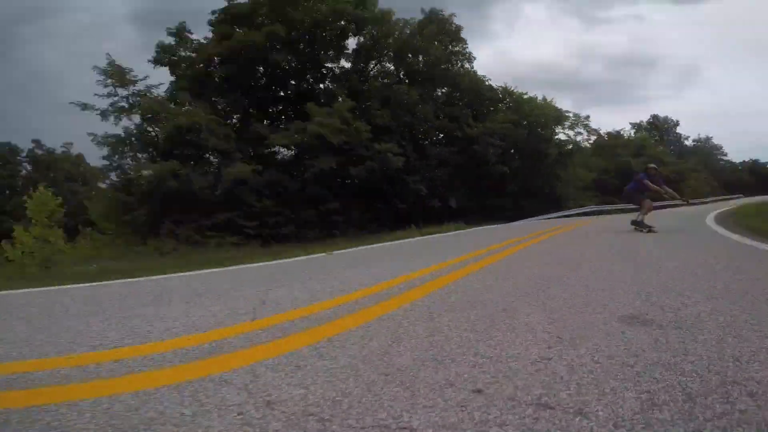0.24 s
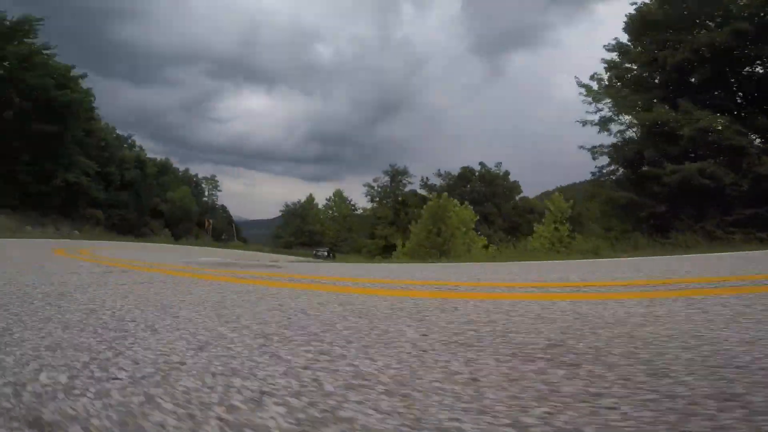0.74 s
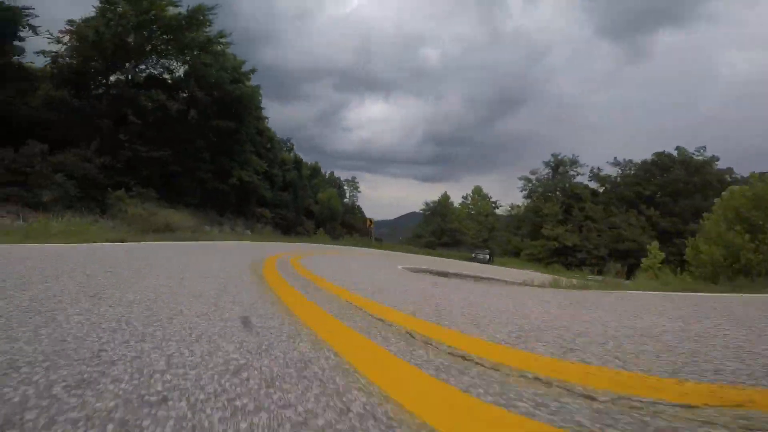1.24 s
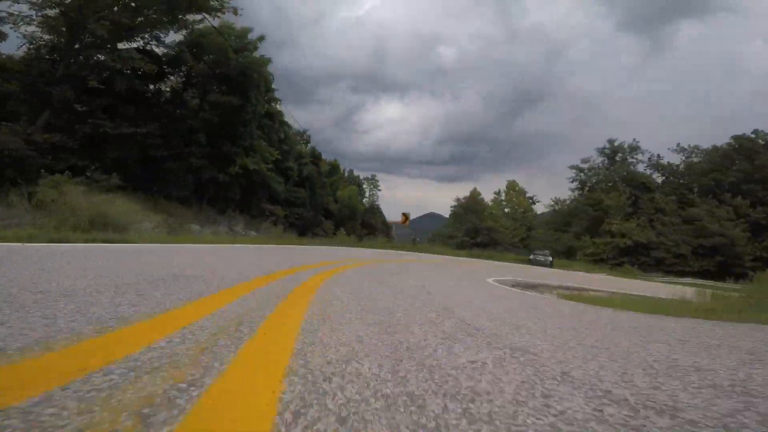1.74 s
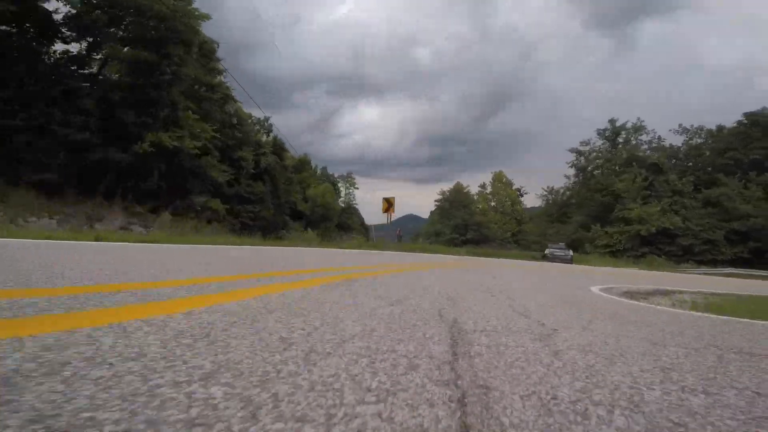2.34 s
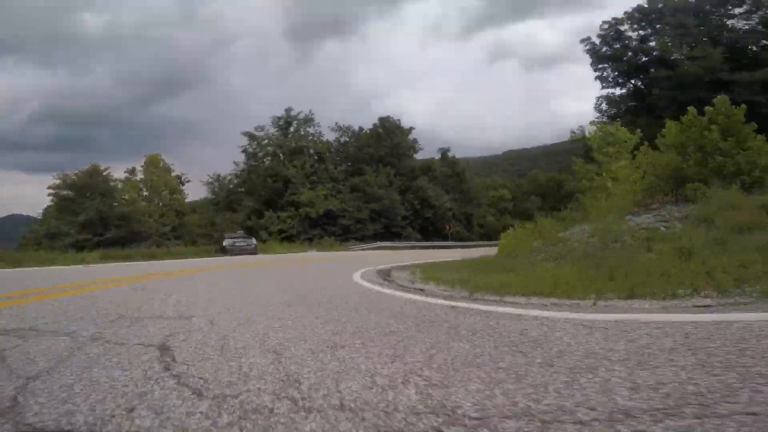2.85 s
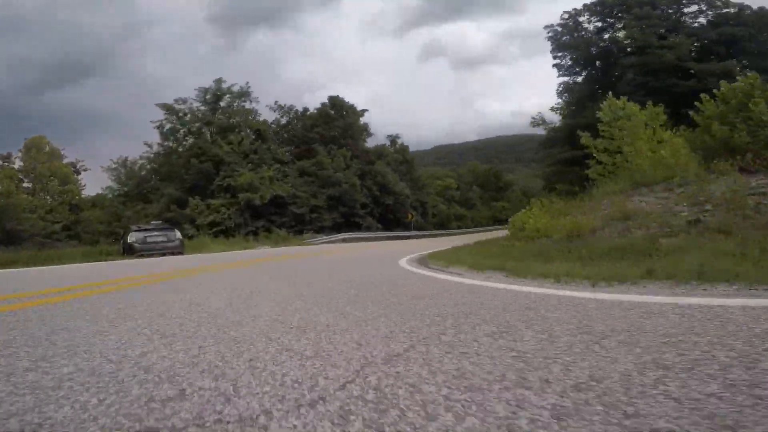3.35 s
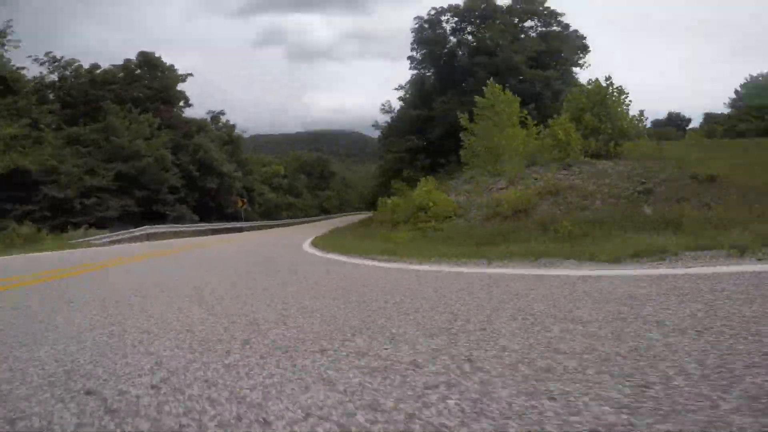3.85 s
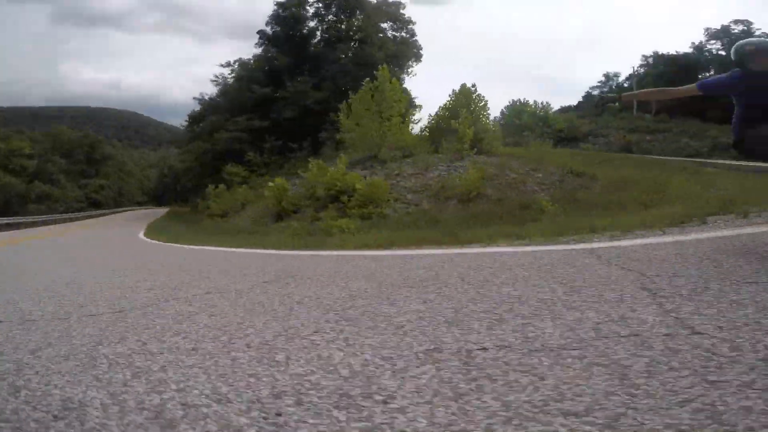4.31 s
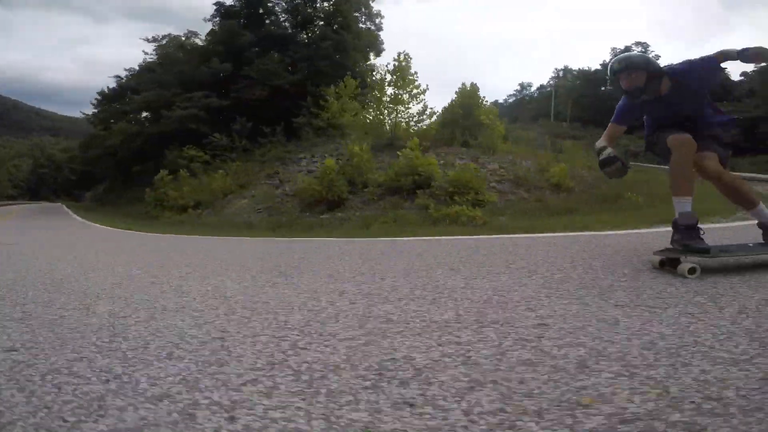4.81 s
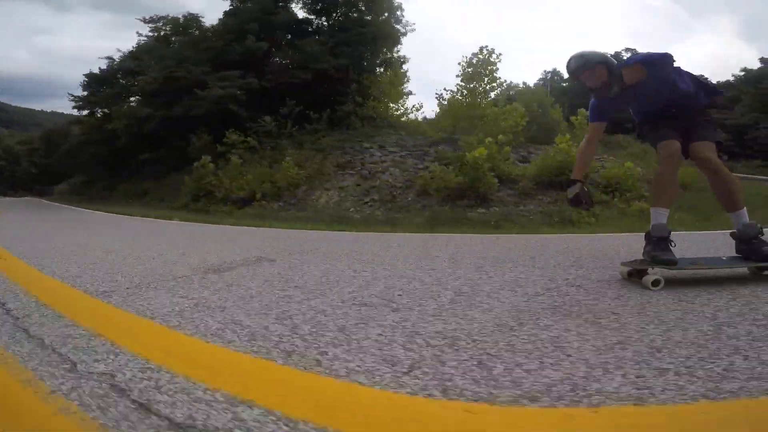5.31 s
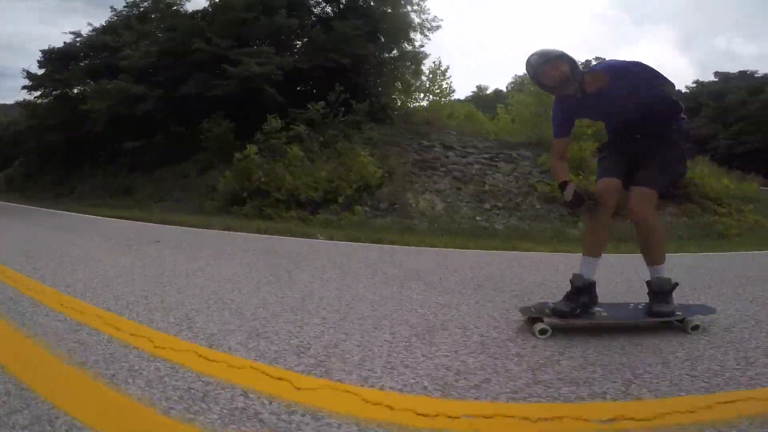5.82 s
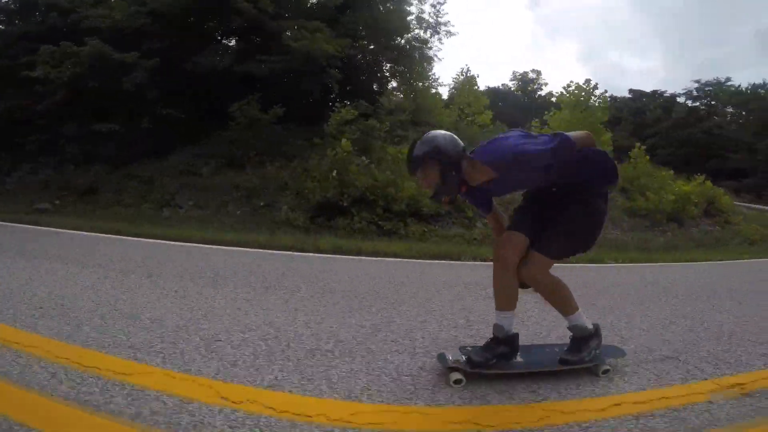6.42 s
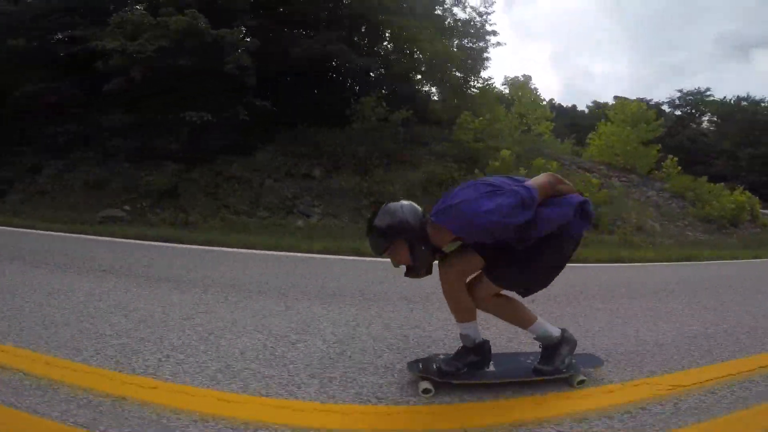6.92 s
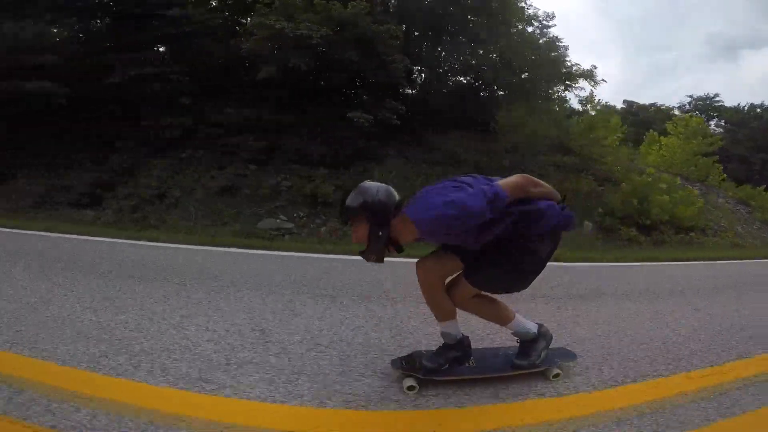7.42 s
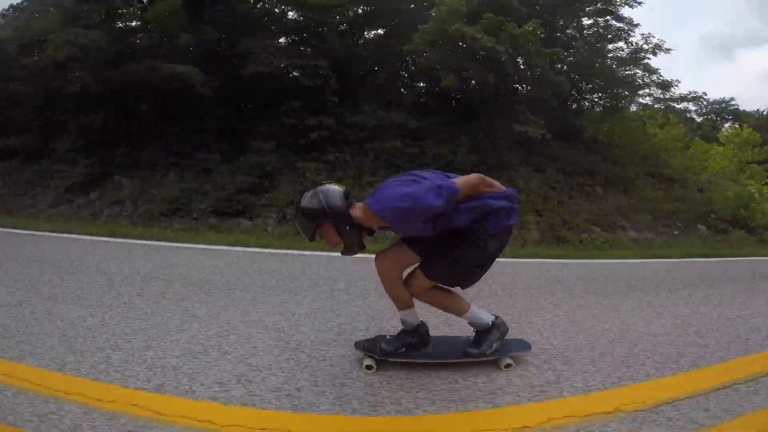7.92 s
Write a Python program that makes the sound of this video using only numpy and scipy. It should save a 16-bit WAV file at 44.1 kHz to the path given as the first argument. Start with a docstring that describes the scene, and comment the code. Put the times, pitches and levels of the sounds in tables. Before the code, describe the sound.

Close aboard a fast longboard outdoors, wind thumps the microphone over a low wheel drone. Around one second the wheels break loose with a hollow, throbbing howl, then scrub in a raspy, hissing screech full of hard clacks and bright grit ticks. The slide catches in rough hops near three to four seconds, fades to light scrubbing, and wind and rolling drone return.

```python
"""A longboard rolls fast on asphalt, its wheels droning, wind buffeting the microphone of a camera aboard.
From about 1 s the wheels break loose and howl in a sideways slide; from 2.5 s they scrub hardest.
Harder scrub means more separate slips; louder hiss brings more fine abrasion on top.
Near 3.2 s the wheels begin to catch in slower hops, then grip and roll on, still lightly scrubbing.
Grit ticks on the board and cracks knock it on the way; the camera's housing hollows the midrange."""
import sys
import numpy as np
from scipy import signal
from scipy.fft import rfft, irfft, next_fast_len
from scipy.io import wavfile
from scipy.ndimage import map_coordinates

SR = 44100
rng = np.random.default_rng(int(sys.argv[2]) if len(sys.argv) > 2 else 0)


def pcm_store(signal):
    """Save signal as 16-bit PCM."""
    levels = np.round(np.clip(np.atleast_2d(signal), -1, 1) * 32767)
    wavfile.write(sys.argv[1], SR, levels.astype(np.int16).T)


N = 359856

# friction of the sideways slide: t/s, scrub level/dB, hiss level/dB
SLIDE = [(0, -47.5, -46), (0.4, -47.5, -63), (0.84, -42.5, -51.5), (0.875, -34, -39), (1.2, -30.5, -34),
         (1.7, -37, -27), (1.9, -27.5, -23.5), (2.16, -22.5, -26), (2.2, -34.5, -30), (2.27, -36.5, -31.5),
         (2.52, -23, -28.5), (3.55, -24.5, -33.5), (3.85, -28, -38.5), (4.12, -29, -28), (4.7, -30, -34),
         (5.2, -33, -36.5), (5.5, -31, -42), (6.25, -29, -42.5), (6.64, -32.5, -50.5), (6.95, -36, -48.5),
         (7.4, -41.5, -55.5), (8.16, -36.5, -54.5)]
# moments when the wheels dig in or skim, lifts signed:
# t/s, length/s, scrub lift/dB, hiss lift/dB, rolling loss/dB, added bite/1
DIGS = [(1.364, 0.12, 7.5, -1, 1, 0), (2.377, 0.025, 4, 3, -1.5, 0.03), (2.782, 0.14, 0.5, 2, -2, 0.3),
        (3.099, 0.088, 2.5, 2.5, -1, 0.36), (3.28, 0.035, -0.5, -5.5, 4.5, 0.1),
        (3.477, 0.11, 1, 1.5, 1.5, 0), (3.6, 0.015, -4, 0, 7, 0), (3.654, 0.2, 7.5, 6, 5, 0.25),
        (3.875, 0.1, 5, 4.5, -1.5, 0.46), (4.206, 0.27, 3, 3, -1.5, 0), (4.798, 0.11, 3.5, 4.5, 1, 0.34),
        (5.077, 0.13, 3.5, 2.5, -2.5, -2.5), (5.58, 0.1, 1.5, -1, -1, 0),
        (6.207, 0.057, 1, -3.5, -2.5, 0.04)]
DIG_RISE_S, DIG_FALL_S = 0.0056, 0.036
# power share of separate slips: in light scrub, its ceiling; scrub level that adds a full share
JUDDER_REST, JUDDER_MOST, JUDDER_FULL_DB = 0.16, 0.97, -15
# slower, harder hops as the wheels begin to catch: their power share of the scrub, the bite they add
CHATTER_START_S, CHATTER_LENGTH_S, CHATTER_RISE_S, CHATTER_FALL_S = 3.2, 0.62, 0.12, 0.32
CHATTER_SHARE, CHATTER_BITE = 0.66, 0.11
# bite: weight of the scrub's upper resonance; at rest, and added while the board is sideways
BITE_REST, BITE_SIDEWAYS = 0.071, 0.29
SIDEWAYS_START_S, SIDEWAYS_LENGTH_S, SIDEWAYS_RISE_S, SIDEWAYS_FALL_S = 0.94, 3.44, 0.06, 0.58
# finest abrasion: level at the given hiss level, growth with hiss
FIZZ_DB, FIZZ_AT_HISS_DB, FIZZ_DB_PER_HISS_DB = -46.5, -25.5, 2.4
# hardest sliding, one long swell: the abrasion and drift it adds
HARD_START_S, HARD_LENGTH_S, HARD_RISE_S, HARD_FALL_S = 2.52, 1.6, 0.27, 0.85
HARD_FIZZ_DB, HARD_DRIFT = -53.5, 0.16
# wheels singing in the bend, pitch sinking as they grip again: t/s, level/dB, f/Hz
SING = [(0.9, -62, 2360), (1.45, -35.5, 2440), (2.1, -33, 2410), (2.24, -47, 2440), (2.6, -45, 2490),
        (3.55, -33, 2580), (3.7, -26, 2710), (3.88, -33, 2720), (4.1, -37, 2400), (4.4, -32.5, 2160),
        (4.7, -40, 2150), (5.3, -35.5, 2040), (5.63, -38, 2010), (6.3, -35, 1960), (6.9, -63, 1890)]
# bright resonance wandering through the hardest sliding: t/s, level/dB, f/Hz
SIZZLE = [(2.25, -72, 5080), (2.42, -31, 4880), (2.65, -34, 4900), (2.8, -29.5, 4700), (3.1, -31, 4920),
          (3.38, -30.5, 5340), (3.55, -30, 5160), (3.8, -44, 4980), (4.24, -40.5, 5200), (4.5, -38.5, 4870),
          (4.9, -51, 5000), (5.4, -70, 5050)]
SING_HALF_WIDTH_HZ, SIZZLE_HALF_WIDTH_HZ = 180, 420
# thin abrasive spray at the very top: t/s, level/dB
SPRAY = [(2.4, -97.5), (2.7, -60), (2.95, -49), (3.4, -50), (3.62, -44), (3.85, -54.5), (4.05, -50),
         (4.3, -70.5), (4.7, -105)]

# howls as the wheels break loose: t/s, length/s, level of a fully risen howl/dB
HOWLS = [(0.99, 1.04, -25), (2.094, 0.37, -24.5)]
HOWL_RISE_S, HOWL_FALL_S, HOWL_WANDER = 0.46, 0.12, 0.018  # wander: fraction of pitch
# wheel resonances: f/Hz, half width/Hz, level/dB
WHEEL_MODES = [(940, 37, 2.5), (1419, 59, 6.5)]
# unevenly worn wheel, slower as it turns sideways: t/s, turn rate f/Hz
TURNS = [(1.6, 33), (1.72, 21.5), (2.1, 23)]
THROB_DB, THROB_AT_S = 2.5, 1.417  # swing per turn; a moment when the worn spot is down

# wheels on the road: t/s, drone level/dB, roar level/dB
ROLL = [(0, -24, -38), (0.2, -33, -47.5), (0.95, -29, -40.5), (1.3, -29.5, -32), (1.6, -25, -28.5),
        (2.1, -26.5, -26), (2.27, -34, -28), (2.5, -22, -29), (2.9, -19, -29.5), (3.6, -19.5, -27),
        (4.25, -21, -30), (4.7, -20, -27), (5.5, -20.5, -33.5), (6.2, -16.5, -29), (6.55, -20.5, -29),
        (6.9, -16, -31), (8.16, -18.5, -32.5)]
# rough asphalt: t/s, length/s, lift level/dB
ROUGH = [(0.44, 0.2, 12), (0.76, 0.037, 8)]
ROUGH_RISE_S, ROUGH_FALL_S = 0.02, 0.11
# growth of unevenness per dB of lift; fraction of the lift passed to scrub and hiss
ROUGH_LUMPS_PER_DB, ROUGH_SCRUB = 0.15, 0.41
# power share of the drone ringing in the wheels: at rest; howl level that adds a full share
DRIFT_REST, DRIFT_FULL_DB = 0.12, -17

# wheels knocking over cracks and pebbles: t/s, level/dB, deck pitch ratio/1, metal ring re level/dB
KNOCKS = [(0.857, -21.5, 1.1, -8), (1.42, -15, 0.74, -20), (1.452, -16, 1, -16), (1.588, -10.5, 0.76, -20),
          (1.614, -13.5, 1.2, -16), (1.777, -15, 0.78, -20), (1.946, -13, 0.92, -18),
          (2.0852, -12, 0.91, -14), (2.456, -12, 0.92, -16), (2.503, -13.5, 0.9, -12),
          (2.62, -7.5, 0.92, -16), (2.63, -12, 1.01, -16), (2.72, -12, 1.08, -14), (3.202, -12.5, 1.1, -16),
          (3.282, -12.5, 1.03, -12), (3.35, -13, 0.97, -10), (3.375, -13.5, 0.93, -9),
          (3.479, -12, 1.07, -12), (3.537, -13.5, 0.97, -16), (3.5992, -7, 1, -13),
          (3.6285, -14, 0.84, -13), (3.701, -10, 1.27, -16), (3.717, -9, 1.13, -16),
          (3.7967, -10.5, 1.2, -14), (3.8306, -9, 1.13, -18), (3.8495, -11, 0.97, -16),
          (3.873, -11.5, 1.1, -16), (3.8936, -12.5, 1.05, -16), (4.047, -15.5, 1.04, -14),
          (4.1878, -10, 1.15, -14), (4.207, -14.5, 1.08, -12), (4.3246, -13.5, 1.2, -14),
          (4.447, -17, 1.08, -14), (4.6442, -10, 1.04, 3.5), (4.8625, -16, 1.03, -10),
          (4.917, -19, 1.6, -5), (5.0446, -19, 0.86, -10), (5.601, -18, 0.92, -14),
          (5.614, -16.5, 0.97, -10), (5.674, -12, 0.98, 6.5)]
# deck modes: f/Hz, level/dB, t60/s
DECK_MODES = [(1610, 0, 0.0075), (1970, 7, 0.011), (2470, 0, 0.013)]
# axle modes, before pitch scaling: f/Hz, level/dB, t60/s
AXLE_MODES = [(3880, -3.5, 0.017), (5530, -2, 0.0066), (6150, -4, 0.0076)]
KNOCK_ATTACK_S, CRACK_DB = 0.0008, -5  # contact time constant; crack re the knock

# grit pinging off the board: t/s, level/dB, ring f/Hz
GRIT = [(0.4497, -23, 5560), (0.657, -25, 4300), (1.2007, -20.5, 5040), (2.0856, -13.5, 5000),
        (2.502, -11.5, 4900), (3.0413, -7, 5000), (3.2816, -12.5, 5040), (3.798, -13, 5230),
        (4.7696, -16.5, 5840), (6.428, -26, 4030), (6.573, -21, 4400), (6.779, -30, 5200),
        (6.952, -24, 4450), (6.986, -20.5, 4560), (7.206, -25.5, 4400), (7.5552, -31, 4600),
        (7.721, -30, 4400), (8.1256, -24.5, 4230)]
TICK_RING_DB, TICK_RING_T60_S, TICK_RING_HALF_WIDTH_HZ = -3.5, 0.007, 206  # level re chip
SAND_PER_S, SAND_DB, SAND_DB_PER_ROAR_DB = 15, -39.5, 0.6  # level at a roar of 0 dB

# jolts that shake the gear: t/s, length/s, lift level/dB
JOLTS = [(0, 0.04, 14), (0.405, 0.071, 16), (0.53, 0.1, 7.5)]
JOLT_RISE_S, JOLT_FALL_S = 0.03, 0.14
RATTLE_DB, RATTLE_DB_PER_DRONE_DB = -50.5, 0.19  # level at a drone of 0 dB

# airflow over the microphone, weak while the board is sideways: t/s, strength level/dB
WIND = [(0, -14), (0.12, -14.5), (0.27, -21.5), (0.42, -13.5), (0.6, -13), (0.74, -20.5), (0.8, -18.5),
        (1.1, -26), (1.5, -26.5), (1.9, -26.5), (2.8, -20.5), (3.9, -25), (4.17, -23), (4.3, -16),
        (5.3, -12), (5.72, -18), (6.05, -13), (7.7, -15.5), (8.16, -10.5)]
# eddies and lulls, lifts signed: t/s, length/s, deep lift/dB, flutter lift/dB
GUSTS = [(0.017, 0.17, 4, 1.5), (0.385, 0.1, 0.5, 4), (0.97, 0.063, 10, 1), (1.988, 0.12, 7, 1),
         (3.0, 0.27, 1, -0.5), (3.99, 1, -7.5, 4), (4.846, 0.15, -2, -3), (5.14, 0.4, -4, 0),
         (5.66, 0.09, 2, -8), (6.095, 0.21, -1.5, 2), (6.44, 0.042, 1, -3), (7.09, 0.16, 0.5, 1.5),
         (7.902, 0.17, -3, 1)]
GUST_RISE_S, GUST_FALL_S = 0.067, 0.037
BUFFET_DB, BUFFET_DB_PER_WIND_DB = -13, 0.31  # level at a wind of 0 dB

# relative spectra, all f/Hz, level per Hz/dB
# scrub: ordinary, then of wheels pushed hard
SCRUB = [(600, -14), (1100, -7.5), (1450, 2), (1950, -0.5), (2400, -2.5), (3100, -9.5), (4500, -8.5),
         (6500, -38.5), (7800, -41.5), (15000, -68)]
SQUEAL = [(900, -30.5), (1500, -0.5), (2100, 6), (2620, 5.5), (3000, -1), (3450, -21), (6500, -34.5),
          (7800, -53.5), (15000, -71)]
# friction hiss, fine abrasion, thin spray: f/Hz, level/dB
HISS = [(1500, -1.5), (3000, -7.5), (4100, -2.5), (4550, -3.5), (5050, 0.5), (5600, 0), (6350, 2),
        (6900, -4.5), (7500, -15), (9500, -24), (12000, -34), (16000, -62.5)]
FINE = [(5000, -28.5), (7500, 7.5), (9000, 4), (11000, 1.5), (13000, -5.5), (15000, -23)]
THIN = [(9000, -32), (11400, -23), (12200, -2.5), (13500, -6), (15300, -17)]
# drone of the deck, low wheel resonance in a sideways slip, road roar: f/Hz, level/dB
DRONE = [(90, -17.5), (190, -4), (285, 0.5), (350, -5.5), (420, -16.5), (490, -11.5), (620, -16),
         (1200, -61)]
GROAN = [(150, -14), (300, -10), (370, -1), (415, 0), (470, -11), (560, -9), (1000, -65.5)]
ROAR = [(300, -29), (520, 4), (640, -2), (710, 0.5), (850, 3.5), (950, 0.5), (1300, -2), (1800, -7),
        (3000, -21), (7000, -43)]
# small hard parts, also sand: f/Hz, level/dB
TINNY = [(2800, -21), (3750, -8), (4300, 0), (5000, 0.5), (5800, -5), (6600, -14), (7400, -20),
         (12000, -49.5)]
# wind's deep buffeting and its flutter: f/Hz, level/dB
BUFFET = [(8, -21), (20, -3.5), (33, 0), (48, -2.5), (68, -2), (100, -12), (200, -49.5), (500, -75.5)]
FLUTTER = [(40, -10), (78, 1.5), (115, 2.5), (200, -3.5), (300, -15), (500, -37.5), (1500, -54),
           (5000, -92.5)]

# hollows of the housing: f/Hz, width scale/Hz, depth level/dB
HOUSING = [(557.3, 59, 18), (1105, 94, 10.5)]
TOP_HZ = 15300


def sliding(rough_db, dig_db, dig_hiss_db, dig_bite, howling, hard_slide):
    """Stick-slip and smooth friction excite scrub, hiss, song and howl; grain impacts add the sizzle and spray."""
    scrub_db, hiss_db = np.array(curves(SLIDE)) + ROUGH_SCRUB * rough_db + [dig_db, dig_hiss_db]
    judder = np.clip(JUDDER_REST + amp(scrub_db - JUDDER_FULL_DB) ** 2, 0, JUDDER_MOST)
    sideways = swell(SIDEWAYS_START_S, SIDEWAYS_LENGTH_S, SIDEWAYS_RISE_S, SIDEWAYS_FALL_S)
    catching = swell(CHATTER_START_S, CHATTER_LENGTH_S, CHATTER_RISE_S, CHATTER_FALL_S)
    chatter = CHATTER_SHARE * catching
    bite = np.clip(BITE_REST + BITE_SIDEWAYS * sideways + CHATTER_BITE * chatter + dig_bite, 0, 1)
    rasp = slips(median_rate_hz=210, scatter=0.45, spread_db=2.2, decay_s=0.0007)
    load = amp(0.36 * wobble(28) + 1.12 * wobble(130))  # shifting weight on the wheels

    def friction(slip_share):
        """Slips and smooth rubbing mixed by power under one load."""
        return load * (np.sqrt(slip_share) * rasp + np.sqrt(1 - slip_share) * noise())

    hops = slips(median_rate_hz=150, scatter=0.4, spread_db=2, decay_s=0.0004)
    # catching wheels trade the fine rasp for hops
    rub = np.sqrt(1 - chatter) * friction(judder) + np.sqrt(chatter) * hops
    scrub_tone = (1 - bite) * coloured(rub, SCRUB) + bite * coloured(rub, SQUEAL)
    scrub = amp(scrub_db + 0.73 * wobble(70)) * scrub_tone
    # higher bands: less slip, more smooth abrasion
    hiss = amp(hiss_db + 0.64 * wobble(80)) * coloured(friction(0.58 * judder), HISS)
    fizz_db = FIZZ_DB + FIZZ_DB_PER_HISS_DB * (hiss_db - FIZZ_AT_HISS_DB)
    abrasion = amp(fizz_db) + amp(HARD_FIZZ_DB) * hard_slide
    fizz = abrasion * amp(0.95 * wobble(41)) * coloured(friction(0.16 * judder), FINE)
    sizzle_grains = impacts(rate_hz=1200, spread_db=3.5)
    sizzle = amp(2.1 * wobble(45)) * gliding(sizzle_grains, SIZZLE, SIZZLE_HALF_WIDTH_HZ)
    sing = gliding(friction(judder), SING, SING_HALF_WIDTH_HZ)
    spray = amp(curves(SPRAY)[0]) * coloured(impacts(rate_hz=1400, spread_db=4.0), THIN)
    return scrub + hiss + fizz + sizzle + spray + sing + howling * howl(friction(judder))


def howl(rub):
    """Friction rings two hollow wheel resonances that wander in pitch and throb once a turn."""
    turns = np.cumsum(curves(TURNS)[0]) / SR
    turns = turns - np.interp(THROB_AT_S, np.arange(N) / SR, turns)
    throb = amp(THROB_DB * np.cos(2 * np.pi * turns) + 1.5 * wobble(45))
    rings = 0
    for hz, half_width_hz, db in WHEEL_MODES:
        pitch_hz = hz * (1 + HOWL_WANDER * wobble(13))
        rings = rings + amp(db + wobble(14)) * resonant(rub * throb, pitch_hz, half_width_hz, order=1)
    return unit(filtered(rings, lambda f: 1 / (1 + (f / 3000) ** 4)))  # urethane swallows the treble


def rolling(lift_db, howling, hard_slide):
    """Thousands of stone impacts a second excite deck, wheels and road roar; rough patches swell them."""
    drone_db, roar_db = curves(ROLL)
    drift = np.clip(DRIFT_REST + howling / amp(DRIFT_FULL_DB) + HARD_DRIFT * hard_slide, 0, 1)
    patches = wobble(40) * (1 + ROUGH_LUMPS_PER_DB * np.maximum(lift_db, 0))
    deck = coloured(impacts(rate_hz=2500, spread_db=2.0), DRONE)
    wheels = coloured(impacts(rate_hz=900, spread_db=1), GROAN)
    drone = amp(drone_db + 0.59 * patches) * (np.sqrt(1 - drift) * deck + np.sqrt(drift) * wheels)
    roar = amp(roar_db + 0.75 * patches) * coloured(impacts(rate_hz=2000, spread_db=1.5), ROAR)
    return amp(lift_db) * (drone + roar)


def knocks():
    """A wheel hits a crack or pebble: a noise crack, the deck's hollow clack, a ring of the axle."""
    out = np.zeros(N + SR)
    for s, db, pitch, metal_db in KNOCKS:
        crack = amp(CRACK_DB) * snap(1400, 5100, t60_s=0.012, order=3)
        knock = crack + ringing(DECK_MODES, pitch) + amp(metal_db) * ringing(AXLE_MODES, 0.95)
        out[round(s * SR):][:len(knock)] += amp(db) * knock
    return out[:N]


def ringing(modes, pitch):
    """Struck modes decay as sines, level and phase varying from blow to blow."""
    t = np.arange(SR // 25) / SR
    tones = 0
    for hz, db, t60_s in modes:
        decay = amp(db + rng.normal() - 60 * t / t60_s)
        tones = tones + decay * np.sin(2 * np.pi * (pitch * hz * t + rng.random()))
    return tones * (1 - np.exp(-t / KNOCK_ATTACK_S))


def grit():
    """Each stone gives a bright chip and a brief ring; sand ticks in between."""
    out = np.zeros(N + SR)
    for s, db, ring_hz in GRIT:
        chip = snap(3870, 6540, t60_s=0.0062, order=6)
        lo_hz, hi_hz = ring_hz - TICK_RING_HALF_WIDTH_HZ, ring_hz + TICK_RING_HALF_WIDTH_HZ
        ring = snap(lo_hz, hi_hz, t60_s=TICK_RING_T60_S, order=3)
        tick = chip + amp(TICK_RING_DB) * ring
        out[round(s * SR):][:len(tick)] += amp(db) * tick
    grains = impacts(rate_hz=SAND_PER_S, spread_db=3)
    sand_db = SAND_DB + SAND_DB_PER_ROAR_DB * curves(ROLL)[1]
    return out[:N] + amp(sand_db) * coloured(grains, TINNY)


def rattle():
    """Road vibration keeps small hard parts chattering; jolts shake them harder."""
    drone_db = curves(ROLL)[0]
    jolt_db = swells(JOLTS, JOLT_RISE_S, JOLT_FALL_S)
    level_db = RATTLE_DB + RATTLE_DB_PER_DRONE_DB * drone_db + jolt_db
    return amp(level_db) * coloured(impacts(rate_hz=1100, spread_db=0.0), TINNY)


def wind():
    """Large eddies thump the microphone, smaller ones flutter; one airflow curve drives both."""
    wind_db, = curves(WIND)
    start, length, *lifts = np.transpose(GUSTS)
    deep_db, flutter_db = [swells(zip(start, length, lift), GUST_RISE_S, GUST_FALL_S) for lift in lifts]
    buffet_db = BUFFET_DB + BUFFET_DB_PER_WIND_DB * wind_db + deep_db
    buffet = amp(buffet_db + 1.4 * wobble(17)) * coloured(noise(), BUFFET)
    unsteady_db = 0.61 * wobble(11) + 1.2 * wobble(50)
    flutter = amp(wind_db + flutter_db + unsteady_db) * coloured(noise(), FLUTTER)
    return buffet + flutter


def slips(median_rate_hz, scatter, spread_db, decay_s):
    """Stick-slip: urethane grips for an uneven while, then lets go in a short rasp; rms 1."""
    chance = rng.standard_normal((6000, 2))
    holds_s = np.exp(scatter * chance[:, 0]) / median_rate_hz
    at = (np.cumsum(holds_s) * SR).astype(int)
    size = amp(spread_db * np.clip(chance[:, 1], -2, 2))
    releases = np.bincount(at[at < N], size[at < N], N)
    envelope = signal.lfilter([1], [1, -np.exp(-1 / (decay_s * SR))], releases)
    return unit(envelope * noise())


def impacts(rate_hz, spread_db):
    """Impulses at random moments, of scattered size and either sign; rms 1."""
    size = amp(spread_db * np.clip(noise(), -2, 2)) * np.sign(noise())
    return unit((rng.random(N) < rate_hz / SR) * size)


def snap(lo_hz, hi_hz, t60_s, order):
    """A short dying burst of band-limited noise, peak 1."""
    t = np.arange(SR // 25) / SR
    burst = rng.standard_normal(len(t)) * (1 - np.exp(-t / 0.00017)) * amp(-60 * t / t60_s)
    x = signal.sosfilt(signal.butter(order, [lo_hz, hi_hz], "band", fs=SR, output="sos"), burst)
    return x / abs(x).max()


def gliding(x, rows, half_width_hz):
    """x in one resonance whose level and pitch follow (s, dB, Hz) rows."""
    db, hz = curves(rows)
    return amp(db) * resonant(x, hz, half_width_hz, order=2)


def resonant(x, hz, half_width_hz, order):
    """x in a moving resonance: shifted to 0 Hz, lowpassed, shifted back; rms 1."""
    carrier = np.exp(2j * np.pi * np.cumsum(hz) / SR)
    slow = signal.sosfilt(signal.butter(order, half_width_hz, fs=SR, output="sos"), x / carrier)
    return unit((slow * carrier).real)


def coloured(x, spectrum):
    """x through (Hz, dB) points that fall away past both ends; rms 1."""
    f, db = np.transpose(spectrum)
    f, db = np.r_[f[0] / 2, f, f[-1] * 2], np.r_[db[0] - 20, db, db[-1] - 20]
    return unit(filtered(x, lambda hz: amp(np.interp(np.log(hz + 1), np.log(f), db))))


def filtered(x, response):
    """x times a response of frequency."""
    m = next_fast_len(N + SR // 4)
    return irfft(rfft(x, m) * response(np.fft.rfftfreq(m, 1 / SR)), m)[:N]


def noise():
    """White noise, rms 1."""
    return rng.standard_normal(N)


def wobble(knots_per_s):
    """A smooth curve through random knots."""
    return map_coordinates(rng.standard_normal(4096), [np.arange(N) * knots_per_s / SR], mode="wrap")


def curves(rows):
    """One value per sample for each column after the time."""
    s, *cols = np.transpose(rows)
    return [np.interp(np.arange(N) / SR, s, c) for c in cols]


def swell(start, length, rise, fall):
    """An envelope within 0-1: rises from start, holds until length has passed, then falls."""
    t = np.arange(N) / SR - start
    return np.clip(np.minimum(t, length) / rise, 0, 1) * np.clip(1 - (t - length) / fall, 0, 1)


def swells(rows, rise, fall):
    """The sum of one swell per (start, length, height) row."""
    return sum(height * swell(start, length, rise, fall) for start, length, height in rows)


def amp(db):
    """Decibels to gain."""
    return 10 ** (np.asarray(db) / 20)


def unit(x):
    """Scale to rms 1."""
    return x / np.sqrt(np.mean(x ** 2) + 1e-20)


def scene():
    """All sources at one microphone; digs shift scrub, hiss, rolling and bite together."""
    rough_db = swells(ROUGH, ROUGH_RISE_S, ROUGH_FALL_S)
    start, length, *lifts = np.transpose(DIGS)
    dig_db, dig_hiss_db, loss_db, dig_bite = [
        swells(zip(start, length, lift), DIG_RISE_S, DIG_FALL_S) for lift in lifts]
    howling = swells([(s, held, amp(db)) for s, held, db in HOWLS], HOWL_RISE_S, HOWL_FALL_S)
    hard_slide = swell(HARD_START_S, HARD_LENGTH_S, HARD_RISE_S, HARD_FALL_S)
    slide = sliding(rough_db, dig_db, dig_hiss_db, dig_bite, howling, hard_slide)
    roll = rolling(rough_db - loss_db, howling, hard_slide)
    return (slide + roll + knocks() + grit() + rattle() + wind())[None]


def record(dry):
    """The housing cuts two hollows; peaks are rounded, ends faded, all above TOP_HZ removed."""
    def hollows(f):
        """Gain of the housing."""
        return amp(-sum(db / (1 + ((f - hz) / width_hz) ** 2) ** 2 for hz, width_hz, db in HOUSING))

    x = filtered(dry[0], hollows)
    x = x / (1 + abs(x / 0.95) ** 6) ** (1 / 6)
    ends = swell(0, N / SR - 0.004, 0.004, 0.004)
    return filtered(x * ends, lambda f: f < TOP_HZ)[None]


dry = scene()
out = record(dry)
pcm_store(out)
```